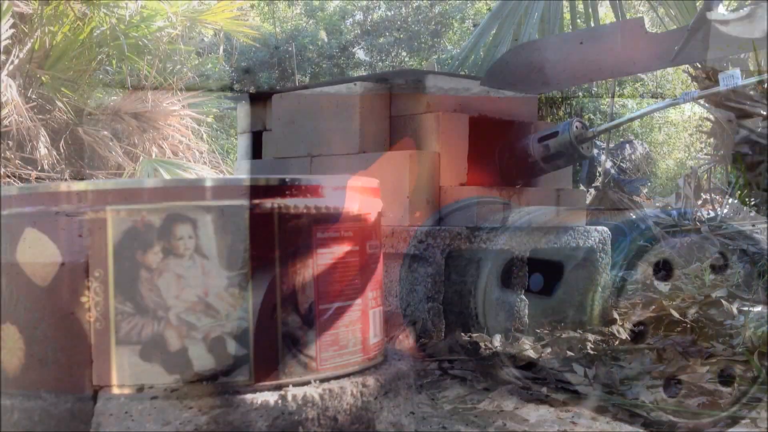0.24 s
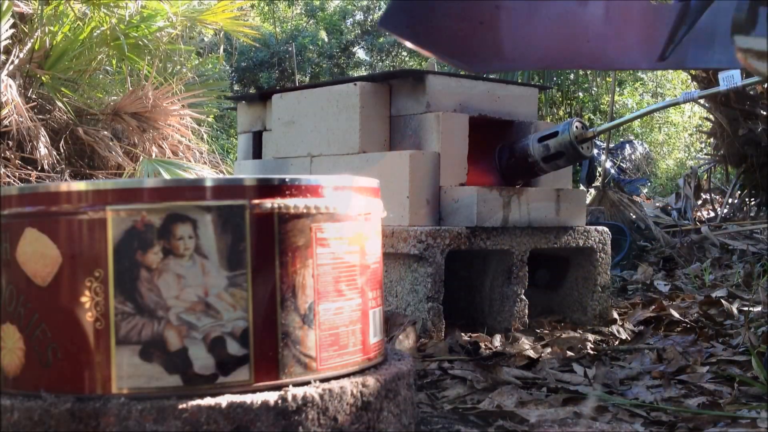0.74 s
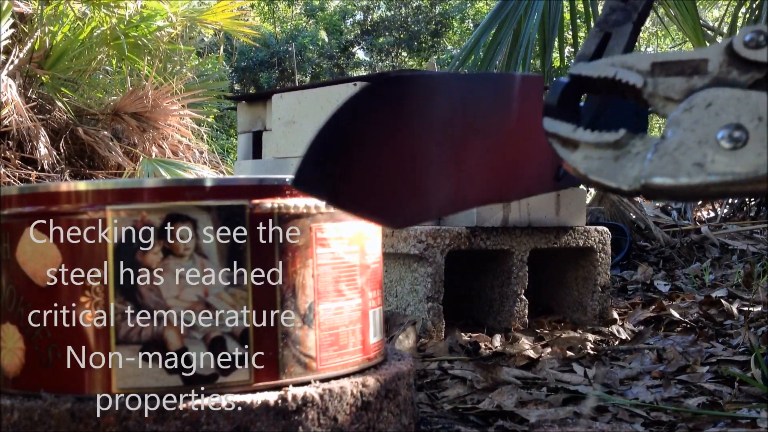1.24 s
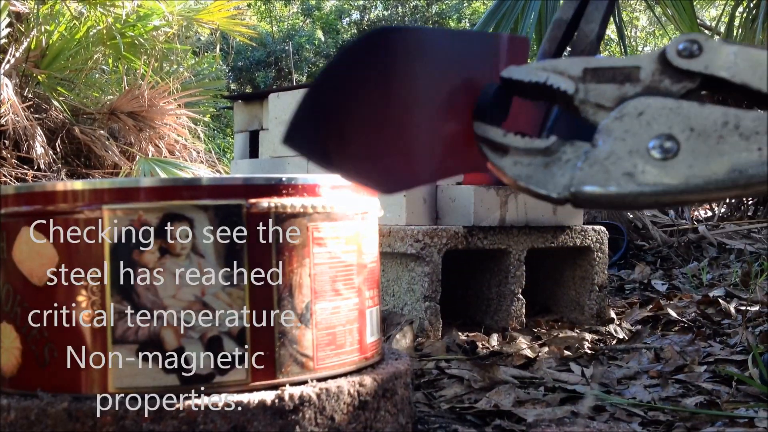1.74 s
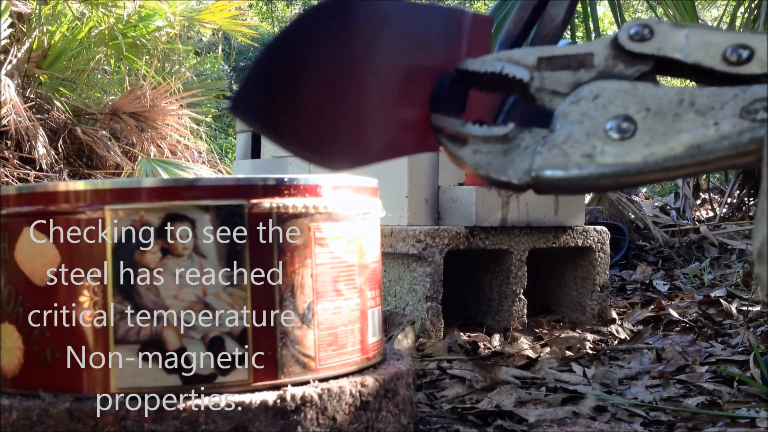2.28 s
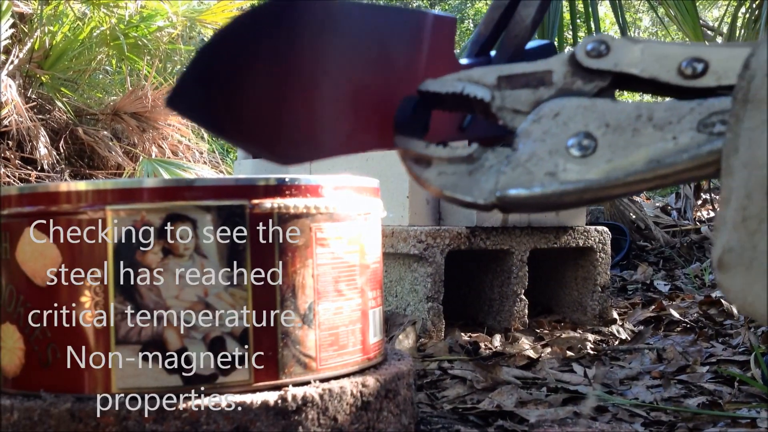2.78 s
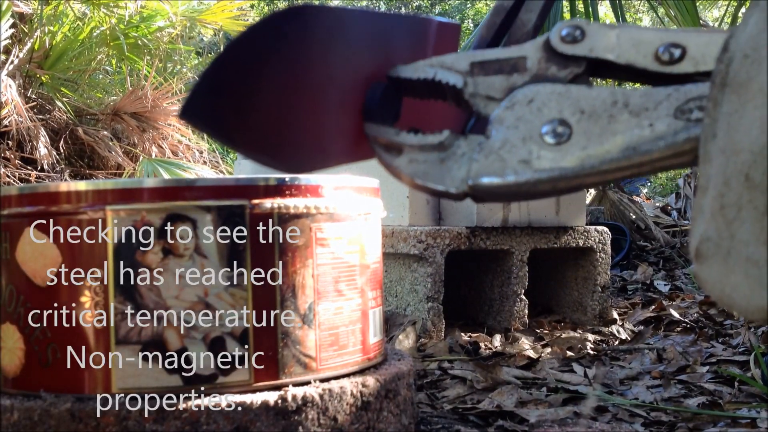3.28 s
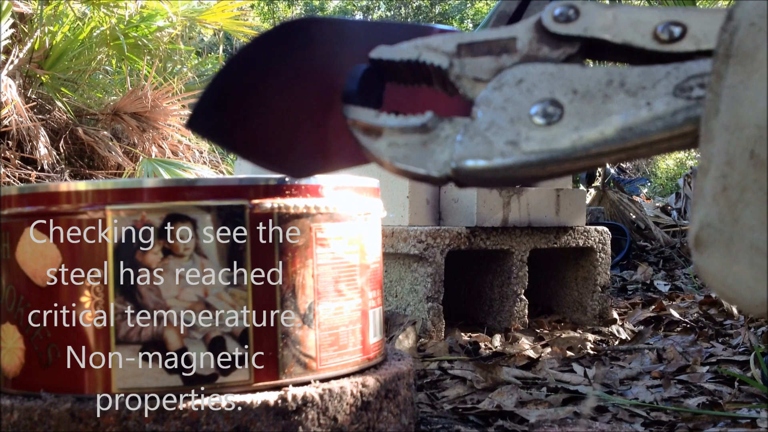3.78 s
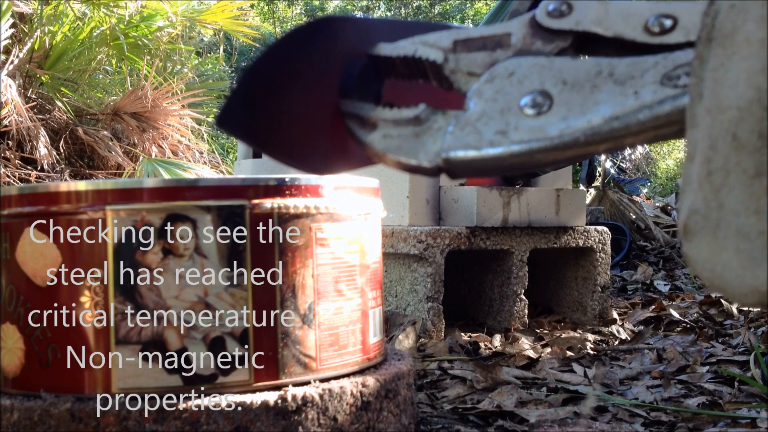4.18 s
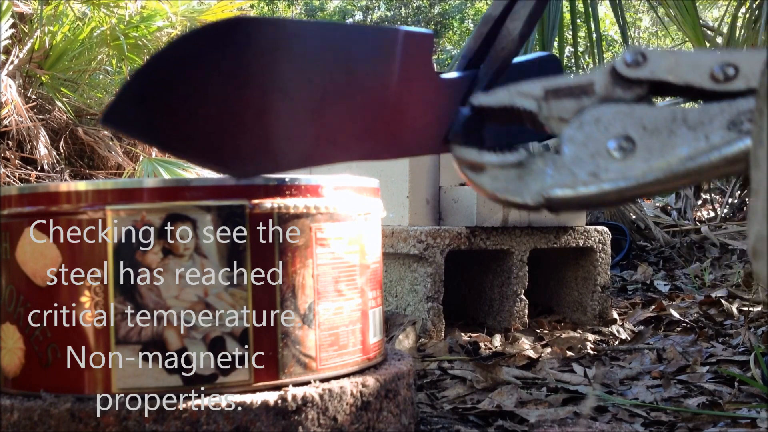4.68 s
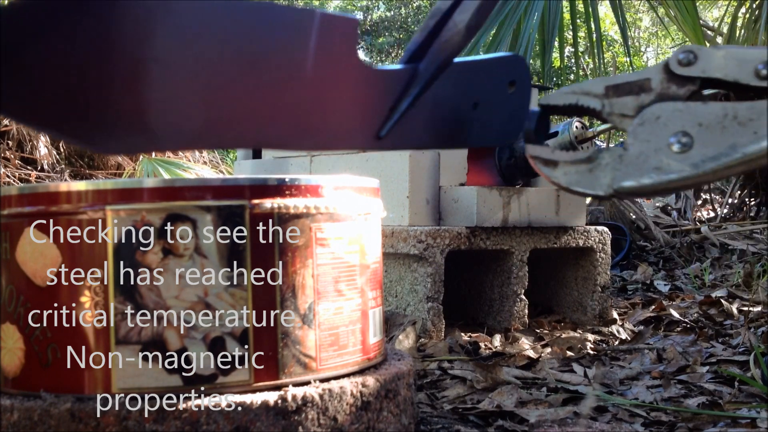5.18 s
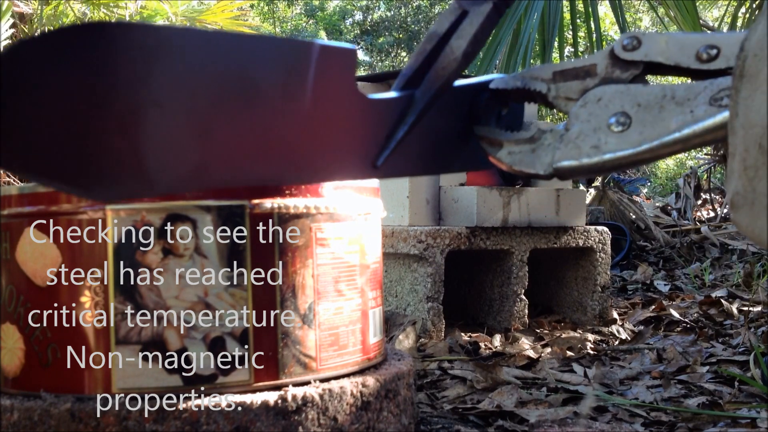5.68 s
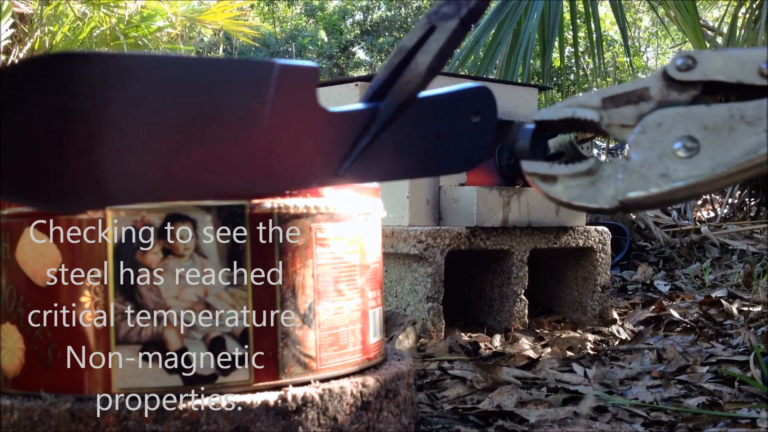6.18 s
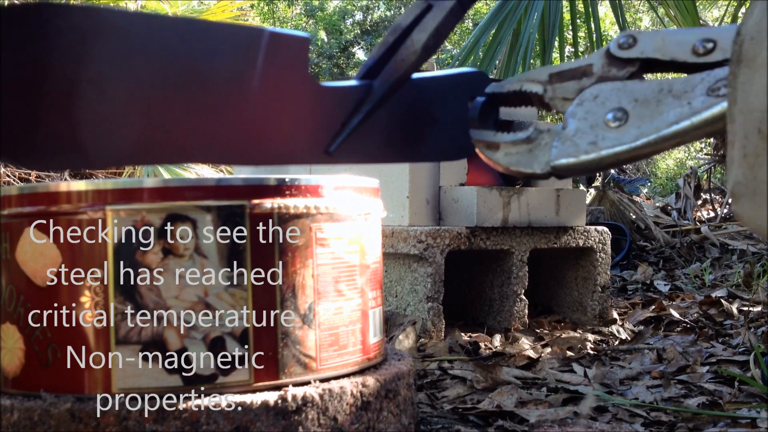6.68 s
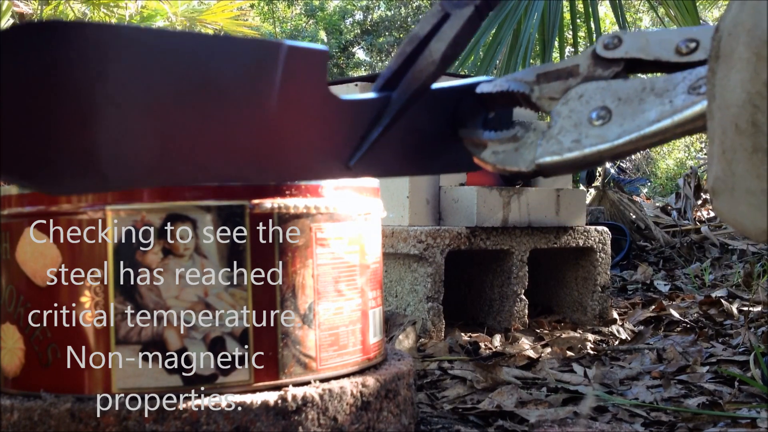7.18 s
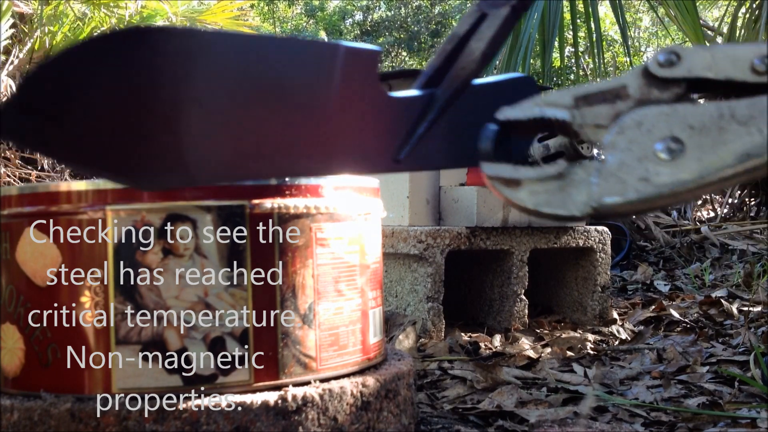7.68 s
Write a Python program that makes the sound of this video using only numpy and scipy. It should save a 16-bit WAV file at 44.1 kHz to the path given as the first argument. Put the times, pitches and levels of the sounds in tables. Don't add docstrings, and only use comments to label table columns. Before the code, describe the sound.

A gas burner fires into a small brick forge outdoors. From 0 to about 1 second it is heard close: a loud, broad roar with low chamber boom, hollow tube tone, raspy edge and gas hiss, fluttering quickly. At about 1.03 seconds the perspective switches almost instantly to a few steps away. The roar drops and dulls; low boom dominates, with weaker midrange roar and thin, slightly patchy hiss. It continues to the end near 7.9 seconds, constantly wavering with small thumps, puffs and brief lulls. A blade in pliers nearby subtly recolours the hiss, brightening it around 4.7 to 5.5. A barely audible touch comes near 1.9 to 2.0, a crisp, loud metallic tick with a tiny rebound at 5.7, and a duller steel knock at 7.1, followed by a very faint tick. Dry and close to the metal.

```python
import sys
import numpy as np
from scipy import signal
from scipy.fft import rfft, irfft, next_fast_len
from scipy.io import wavfile
from scipy.ndimage import uniform_filter1d

SR = 44100
rng = np.random.default_rng(int(sys.argv[2]) if len(sys.argv) > 2 else 0)


def pcm_store(signal):
    levels = np.round(np.clip(np.atleast_2d(signal), -1, 1) * 32767)
    wavfile.write(sys.argv[1], SR, levels.astype(np.int16).T)


def nominal_scale(level):
    x = np.asarray(level, float) / 20
    return 10 ** x


N = 350154


def in_time(rows):
    s, *columns = np.transpose(rows)
    return [np.interp(np.arange(N) / SR, s, column) for column in columns]


def swells(rows, half_s):
    coarse_t = np.arange(0, N + 64, 64) / SR
    s, db = np.transpose(rows)[:, :, None]
    level_db = np.sum(db * np.exp(-.5 * ((coarse_t - s) / half_s) ** 2), axis=0)
    return np.interp(np.arange(N) / SR, coarse_t, level_db)


def rms_one(x):
    return x / np.sqrt(np.mean(x ** 2) + 1e-20)


def drift(rate_hz):
    r = np.exp(-2 * np.pi * rate_hz / SR)
    slow = signal.lfilter([1], [1, -2 * r, r * r], rng.standard_normal(N + SR))[SR:]
    return rms_one(slow - slow.mean())


def bells(x, shape):
    size = next_fast_len(N)
    hz = np.arange(size // 2 + 1) * SR / size
    level_db = 0
    for centre_hz, width_hz, db in shape:
        level_db = level_db + db / (1 + (2 * (hz - centre_hz) / width_hz) ** 2)
    return irfft(rfft(x, size) * nominal_scale(level_db), size)[:N]


def colour(x, spectrum, shape):
    size = next_fast_len(N)
    hz = np.maximum(np.arange(size // 2 + 1) * SR / size, 1)
    points = np.array(spectrum)
    level_db = np.interp(np.log(hz), np.log(points[:, 0]), points[:, 1], left=-90, right=-90)
    smooth = irfft(rfft(x, size) * nominal_scale(level_db), size)[:N]
    return rms_one(bells(smooth, shape))


def split(x, notch_hz):
    below = signal.sosfiltfilt(signal.butter(6, notch_hz, fs=SR, output="sos"), x)
    return rms_one(below), rms_one(x - below)


def turbulence(puffs, shared_db, own_db, own_hz):
    return rng.standard_normal(N) * nominal_scale(shared_db * puffs + own_db * drift(own_hz))


TUBE_NOTCH_HZ = 1905

# t/s, level/dB
FLARES = [(0.3, 1.5), (0.7, 1.5), (0.82, -1.5), (0.95, 2), (1.05, -2.5), (1.38, -0.5), (1.75, -3.5),
          (2.07, 1.5), (2.4, -2), (2.8, 4.5), (3.1, -4), (3.68, 1), (4.1, -4), (4.3, 2), (4.8, 2.5),
          (5.05, -4), (5.32, 0.5), (5.55, -1.5), (5.95, -3), (6.2, 2.5), (6.55, 0), (6.8, 3), (7.0, -3.5),
          (7.6, -1)]


def flares():
    return swells(FLARES, half_s=0.071)


# t/s, level/dB
THUMPS = [(.15, 2.5), (.21, -8), (.31, -1.5), (.82, -2.5), (.91, 5), (.975, 1.5), (1.02, -2.5), (1.28, 4),
          (1.89, 3), (2.1, 3.5), (3.14, 4), (3.27, -7), (3.63, 4), (4.17, -8), (4.27, 5.5), (4.42, -1.5),
          (5.26, 4), (5.34, -3), (5.41, -3), (5.57, 3), (5.6, -8), (5.66, 6), (6.01, -6), (6.17, 6.5),
          (6.3, -3.5), (6.35, 3), (6.6, 5), (6.92, -8), (7.17, 2.5), (7.27, 5), (7.76, 5.5), (7.81, 4),
          (7.845, 4.5)]


def thumps():
    return swells(THUMPS, half_s=0.0099)


# t/s, roar level/dB, rasp level/dB
SPITS = [(.26, 0, 0), (.52, 0.5, 2.5), (.6, 1.5, -3.5), (.73, 3, 2), (1.21, 1, 2), (1.88, 1, 0),
         (4.07, 1.5, 0), (5.01, 1, 0), (.97, 7.5, 3.5), (1.18, -6, 0), (1.36, 1, 1), (1.47, -1, 3),
         (1.74, 3, 7), (2.04, -0.5, -3), (2.13, -2, 0.5), (2.19, 4, -0.5), (2.42, 1, -2), (2.51, -1, 0.5),
         (2.73, -3.5, -5), (2.81, 2, -3), (3.17, 3.5, -0.5), (3.61, 4, 0), (3.76, 1.5, 4.5), (3.9, -1, -3),
         (4.22, 2.5, -6), (4.26, -1, 3.5), (4.4, 2, 0), (4.6, 1, -1), (4.68, 1, 5), (4.79, 2.5, 1),
         (5.22, 0.5, 2), (5.39, 4.5, 5.5), (5.51, 0, -6), (5.89, -1, 5), (6.47, -2.5, 3), (6.6, 1.5, 2),
         (6.81, -3, 3), (6.98, 1, -3), (7.19, -3, -5), (7.75, 2.5, 3.5), (7.85, -1, -2.5)]


def spits():
    rows, half_s = np.array(SPITS), 0.012
    return swells(rows[:, [0, 1]], half_s), swells(rows[:, [0, 2]], half_s)


def tube_and_jet_levels(roar_db, rasp_db, hiss_db):
    flare_db = flares()
    roar_spit_db, rasp_spit_db = spits()
    roar_db, rasp_db, hiss_db = roar_db + 0.44 * flare_db, rasp_db + 0.66 * flare_db, hiss_db + 0.22 * flare_db
    return roar_db, roar_spit_db, rasp_db + rasp_spit_db, hiss_db


# f/Hz, level/dB (per Hz)
NEAR_ROAR = [(30, -40), (60, -38), (110, -13), (170, 0), (330, -1.5), (600, -2.5), (1200, -14.5),
             (2000, -19.5), (3000, -17), (3700, -41), (5000, -52)]
# f/Hz, width/Hz, level/dB
NEAR_ROAR_SHAPE = [(425, 93, 12), (550, 160, -14.5), (793, 160, 6), (925, 100, 9.5), (1167, 90, -8),
                   (1526, 230, 8.5), (1830, 97, -14.5), (2570, 220, -2.5), (2750, 150, 6.5),
                   (3530, 150, -2)]
# f/Hz, level/dB (per Hz)
NEAR_JET = [(2500, -19), (3600, 0), (4300, -7), (6000, -1), (8500, -0.5), (10000, -4), (13000, -2.5),
            (13400, -9), (13600, -15), (14400, -12), (15200, -6), (16000, -5)]
# f/Hz, width/Hz, level/dB
NEAR_JET_SHAPE = [(5360, 200, 3), (5800, 200, 2), (6300, 300, -5), (7520, 490, 10.5), (7940, 320, -7),
                  (8400, 250, 2), (8940, 100, -8), (9500, 380, -9), (10100, 100, -2), (10600, 300, 4.5),
                  (10800, 150, -4), (11700, 200, -3), (12850, 350, 7), (14200, 150, -5)]


def burner_near(puffs):
    roar_db, roar_spit_db, rasp_db, hiss_db = tube_and_jet_levels(-20.5, -35.5, -37)
    flame = colour(turbulence(puffs, shared_db=0.5, own_db=0.9, own_hz=61.4), NEAR_ROAR, NEAR_ROAR_SHAPE)
    hiss = colour(turbulence(puffs, shared_db=0.5, own_db=1.5, own_hz=150), NEAR_JET, NEAR_JET_SHAPE)
    roar, rasp = split(flame, TUBE_NOTCH_HZ)
    boom, roar = split(roar, notch_hz=540)
    body = nominal_scale(thumps()) * boom + nominal_scale(-3.5 + roar_spit_db) * roar
    return nominal_scale(roar_db) * rms_one(body) + nominal_scale(rasp_db) * rasp + nominal_scale(hiss_db) * hiss


# t/s, level/dB
DRAUGHTS = [(1.08, -1.5), (1.35, 2.5), (3.2, 0), (4.05, 0), (4.35, 0.8), (5.2, -0.5), (5.95, 1.5),
            (6.22, -0.5), (7.6, 0.5), (2.05, 0.5), (2.25, 1), (6.9, -1.5), (7.85, 0.5), (2.93, -0.5),
            (5.0, 1)]


def draughts():
    return swells(DRAUGHTS, half_s=0.11)


# f/Hz, level/dB (per Hz)
FAR_LOW = [(30, -44), (60, -39.5), (110, -14.5), (170, 0), (300, 0.5), (430, 2.5), (520, -24), (700, -72)]
# f/Hz, width/Hz, level/dB
FAR_LOW_SHAPE = [(246, 23, -3), (401.8, 65, 7), (505, 20, -10)]


def boom_far(puffs):
    level_db = -27 + 0.17 * flares() + draughts() + thumps()
    boom = colour(turbulence(puffs, shared_db=-1.1, own_db=0.87, own_hz=33), FAR_LOW, FAR_LOW_SHAPE)
    return nominal_scale(level_db) * boom


# f/Hz, level/dB (per Hz)
FAR_UPPER = [(350, -28), (520, -6.5), (640, 4), (1000, -7), (1500, -12), (2000, -11), (2450, -16),
             (2650, -27), (3300, -23.5), (3600, -38.5), (5000, -44)]
# f/Hz, width/Hz, level/dB
FAR_UPPER_SHAPE = [(516, 30, -9), (716, 138, -9.5), (888.6, 200, 11), (1005, 46, -14), (1306, 145, -12),
                   (1430, 94, 8.5), (1458, 31, -6.5), (1730, 41, -3.5), (1740, 95, -5.5),
                   (1917, 111, -22.5), (2164, 165, 6.5), (2198, 58, -7), (2342, 340, 6), (2696, 91, 4.5),
                   (2843, 73, 6.5), (2960, 130, -1), (3160, 100, 3), (3410, 150, -4.5)]
# f/Hz, level/dB (per Hz)
FAR_JET = [(2500, -19), (3500, -3), (5000, 0), (7000, 1.5), (9000, 0.5), (11000, -1.5), (13100, 1),
           (13450, -5), (14300, -9), (14550, -3), (16000, -5)]
# f/Hz, width/Hz, level/dB
FAR_JET_SHAPE = [(3710, 100, 3.5), (3970, 110, 8.5), (4400, 200, -1), (4680, 150, 3.5), (4940, 150, -6),
                 (5280, 300, 1.5), (5780, 180, -6), (6300, 300, -5.5), (6440, 200, 3.5), (7580, 130, 6),
                 (8050, 300, -2), (8600, 180, 8.5), (8980, 140, -7.5), (9100, 100, 7), (9470, 210, -15),
                 (9800, 120, -9), (10000, 130, 0), (10400, 120, 1), (10570, 200, 1.5), (10900, 200, -4),
                 (11900, 300, -4), (12450, 300, 1), (13000, 150, 2), (13700, 60, -4), (13800, 80, 4)]


def tube_and_jet_far(puffs):
    roar_db, roar_spit_db, rasp_db, hiss_db = tube_and_jet_levels(-36.5, -47, -55)
    upper = colour(turbulence(puffs, shared_db=1.0, own_db=-0.7, own_hz=60), FAR_UPPER, FAR_UPPER_SHAPE)
    hiss = colour(turbulence(puffs, shared_db=1.9, own_db=1.0, own_hz=200), FAR_JET, FAR_JET_SHAPE)
    roar, rasp = split(upper, TUBE_NOTCH_HZ)
    return nominal_scale(roar_db + roar_spit_db) * roar + nominal_scale(rasp_db) * rasp + nominal_scale(hiss_db) * hiss


# t/s, lowered [0-1], sliding [0-1], held flat [0-1]
BLADE = [
    (1.0, 1, 0, 0),
    (1.5, 1, 0, 0),
    (1.95, 0, 0, 0),
    (4.66, 0, 0, 0),
    (4.74, 0, 1, 0),
    (5.4, 0, 1, 0),
    (5.55, 0, .3, .7),
    (5.85, 0, 0, 1),
    (7.94, 0, 0, 1),
]
# f/Hz, width/Hz, level/dB
LOWERED = [(1750, 110, 5), (2220, 300, 2), (3080, 180, 5), (5230, 280, 4), (7500, 1200, 1.5),
           (8600, 300, -2), (12500, 400, 0)]
SLIDING = [(1260, 150, 2.5), (2010, 300, 3.5), (2500, 120, -2), (3350, 300, 1.5), (4100, 500, 3.5),
           (4900, 200, 3), (6350, 520, 3), (8400, 400, -3), (9500, 400, 5), (10250, 400, -5),
           (10850, 200, 3), (11600, 350, 5), (12900, 400, -6), (13500, 400, 8)]
HELD_FLAT = [(1020, 110, 2.5), (2510, 330, 3), (2740, 150, -3), (8600, 250, -2.5), (9150, 200, 2.5),
             (9950, 300, 3), (11600, 800, 2), (12600, 300, 0), (12950, 200, -3)]


def past_the_blade(direct):
    shares = in_time(BLADE)
    heard = (1 - sum(shares)) * direct
    for share, pose in zip(shares, [LOWERED, SLIDING, HELD_FLAT]):
        heard = heard + share * bells(direct, pose)
    return heard


def burner_far(puffs):
    return boom_far(puffs) + past_the_blade(tube_and_jet_far(puffs))


# t/s, narrow level/dB, broad level/dB
WHISTLES = [(1.03, -74, -60), (1.22, -75, -60), (1.32, -85, -78.5), (1.9, -85, -80), (2.05, -76, -66),
            (2.35, -76, -68), (2.8, -65, -69), (3.3, -80, -72), (3.9, -74, -70), (4.3, -62, -74),
            (4.6, -77, -72), (4.75, -80, -82), (5.4, -85, -80), (6.0, -85, -71), (6.65, -85, -65),
            (7.1, -85, -72), (7.55, -85, -68), (7.94, -85, -71)]


def whistles():
    out = 0
    for level_db, hz, width_hz in zip(in_time(WHISTLES), [8612, 12800], [60, 350]):
        edges_hz = [hz - width_hz / 2, hz + width_hz / 2]
        band = signal.butter(2, edges_hz, "band", fs=SR, output="sos")
        ringing = rms_one(signal.sosfilt(band, rng.standard_normal(N)))
        out = out + nominal_scale(level_db + 1.5 * drift(7.0)) * ringing
    return out


# t/s, crack level/dB, ring level/dB, low share level/dB
TICKS = [
    (1.9035, -70, -62, 35.0),
    (1.975, -52, -58, -5.0),
    (5.7041, -18, -27, -22.0),
    (5.7112, -30, -41, -20.0),
    (7.1219, -30, -32, 9.0),
    (7.1247, -42, -31, 12.0),
    (7.1905, -46, -58, -20.0),
]
# f/Hz, first grip level/dB, second grip level/dB, time to fall 60 dB/s
STEEL = [(1490, -40, -9, .04), (1900, -30, -12, .025), (3000, -30, -10, .03), (3800, -9, -4, .03),
         (4390, -3, -12, .016), (4855, -9, 0, .065), (5030, -4, -20, .016), (5350, -4, -13, .015),
         (5825, -4, -6, .025), (6600, -8, -13, .02), (7200, -3, -19, .02), (8450, -13, -19, .03),
         (8760, -10, -19, .035), (10480, -16, -21, .035)]


def steel_ticks():
    regrip_s = 6.5
    out, t = np.zeros(N + SR), np.arange(SR // 8) / SR
    hz, first_db, second_db, t60 = np.transpose(STEEL)[:, :, None]
    signs = (-1) ** np.arange(len(hz))[:, None]
    bright = signal.butter(4, [3900, 9000], "band", fs=SR, output="sos")
    top = signal.butter(2, [11000, 15000], "band", fs=SR, output="sos")
    dull = signal.butter(2, [900, 5500], "band", fs=SR, output="sos")
    for s, crack_db, ring_db, low_db in TICKS:
        grip_db = first_db if s < regrip_s else second_db
        strengths = nominal_scale(grip_db - 60 * t / t60 + rng.normal(0, 1, hz.shape))
        rings = np.sum(strengths * signs * np.sin(2 * np.pi * hz * t), axis=0)
        rings *= np.minimum(t / .0006, 1)
        noise = rng.standard_normal(len(t))
        noise[0] = 3
        patter = (nominal_scale(-60 * t / .009) + nominal_scale(-24 - 60 * t / .08)) * noise
        crack = signal.sosfilt(bright, patter) + nominal_scale(low_db) * signal.sosfilt(dull, patter)
        crack += nominal_scale(-9 - 60 * t / .011) * signal.sosfilt(top, noise)
        at = round(s * SR)
        out[at:at + len(t)] += nominal_scale(crack_db) * crack + nominal_scale(ring_db) * rings
    return out[:N]


def scene():
    move_s, fade_s = 1.030, 0.007
    puffs = 0.47 * drift(6.3) + 0.21 * drift(61)
    progress = np.clip((np.arange(N) / SR - move_s) / fade_s + .5, 0, 1)
    moved = np.sin(np.pi / 2 * progress) ** 2
    near = (1 - moved) * burner_near(puffs)
    far = moved * (burner_far(puffs) + whistles())
    return (near + far + steel_ticks())[None]


# low f/Hz, high f/Hz, silence threshold level/dB (re band mean)
STARVED = [(2550, 3050, -4.5), (3350, 3800, -3.6), (4100, 8300, -5.5), (5620, 5780, -2), (8780, 8980, -2.5),
           (9330, 9830, .4), (9900, 13250, -5), (10750, 10950, -1), (13300, 14420, 2.0), (14420, 15300, -5)]


def thin_weak_parts(x):
    top_hz, wander_db = 15320, 1.4
    hz, s, lines = signal.stft(x, SR, "cosine", nperseg=2048, noverlap=1024)
    power = np.abs(lines) ** 2 + 1e-24
    band_db = signal.medfilt2d(10 * np.log10(uniform_filter1d(power, size=15, axis=0)), [1, 7])
    line_power = uniform_filter1d(uniform_filter1d(power, size=3, axis=0), size=2, axis=1)
    line_db = 10 * np.log10(line_power)
    treble = (hz > 4000) & (hz < 9000)
    sudden = 10 * np.log10(power[treble].mean(axis=0)) > band_db[treble].mean(axis=0) + 5
    sliding = np.interp(s, *np.transpose(BLADE)[[0, 2]])
    threshold_db = np.full(power.shape, -99.)
    for low_hz, high_hz, db in STARVED:
        budget_db = wander_db * np.interp(s, np.arange(N) / SR, drift(11.0))
        threshold_db[(hz > low_hz) & (hz < high_hz)] = db + budget_db - 2 * sliding
    silent = (line_db - band_db < threshold_db) & ~sudden
    gain = np.where((hz < top_hz)[:, None], 1 - silent, nominal_scale(-32) * sudden)
    return signal.istft(lines * gain, SR, "cosine", nperseg=2048, noverlap=1024)[1][:N]


def roll_off(x):
    return signal.sosfilt(signal.butter(12, 15610, fs=SR, output="sos"), x)


def record(dry):
    thinned = thin_weak_parts(dry[0])
    return roll_off(thinned[None])


dry = scene()
out = record(dry)
pcm_store(out)
```